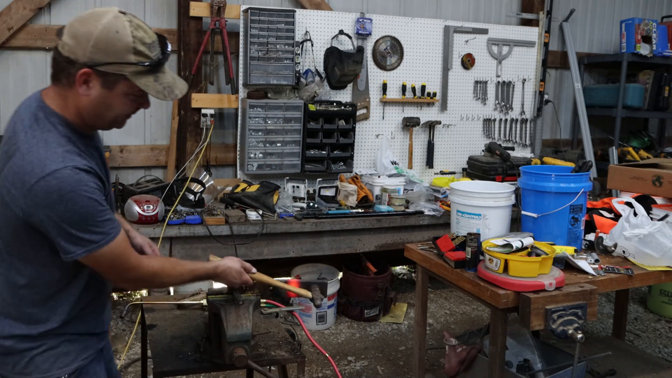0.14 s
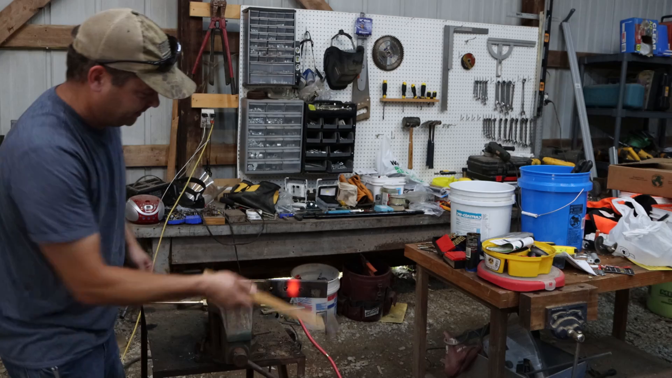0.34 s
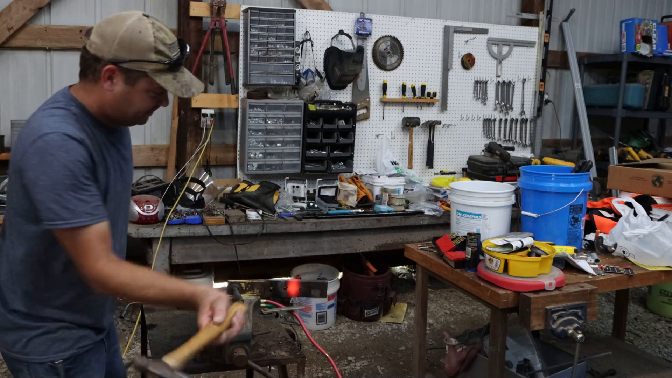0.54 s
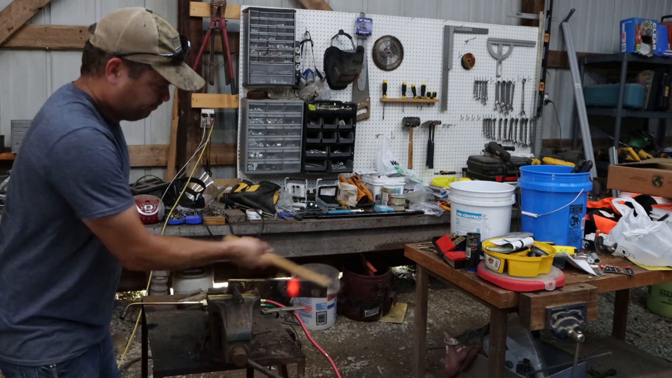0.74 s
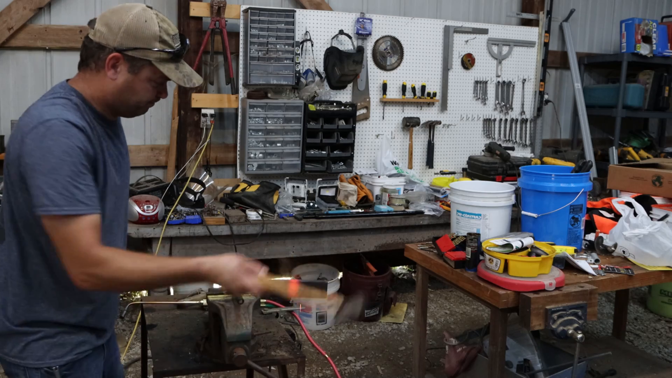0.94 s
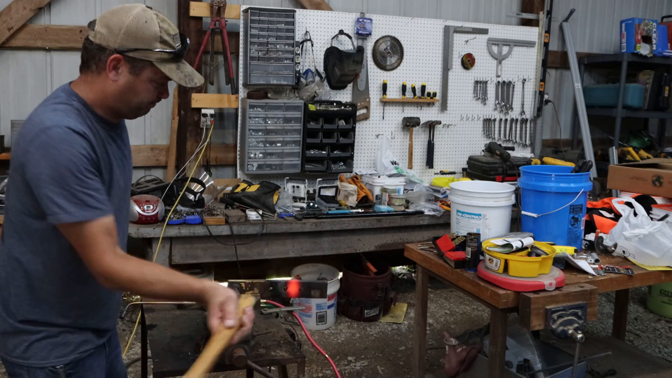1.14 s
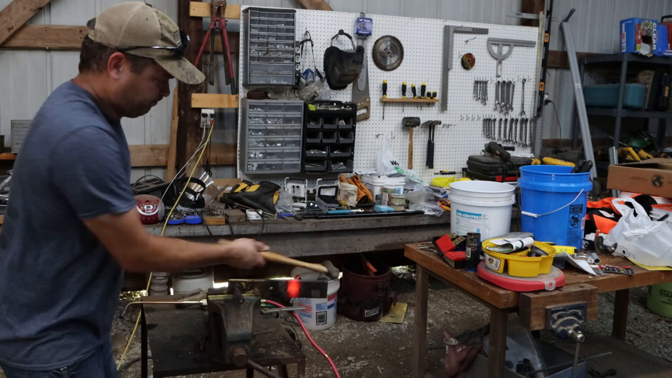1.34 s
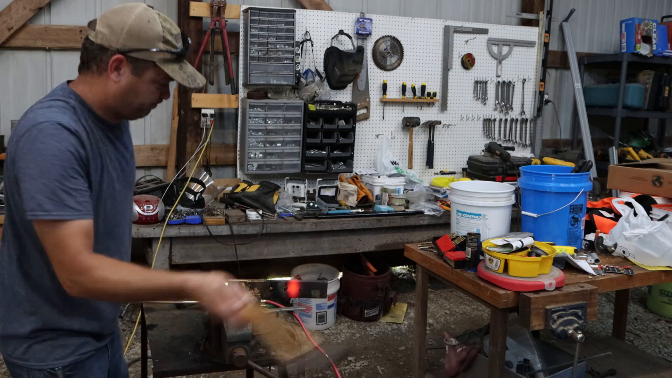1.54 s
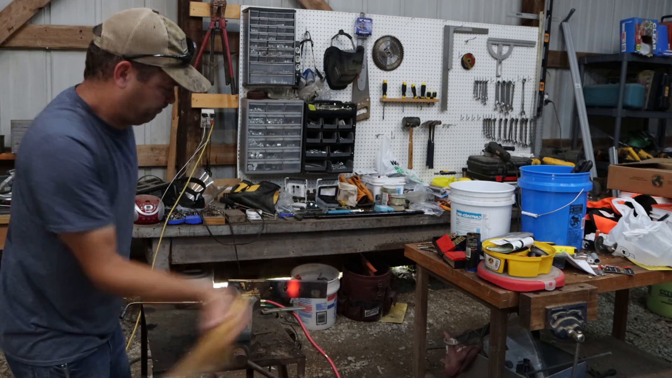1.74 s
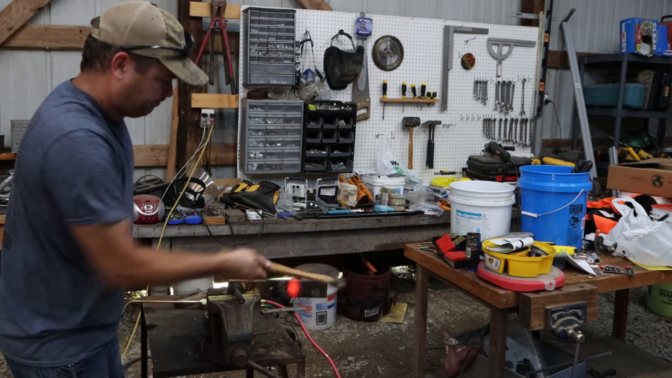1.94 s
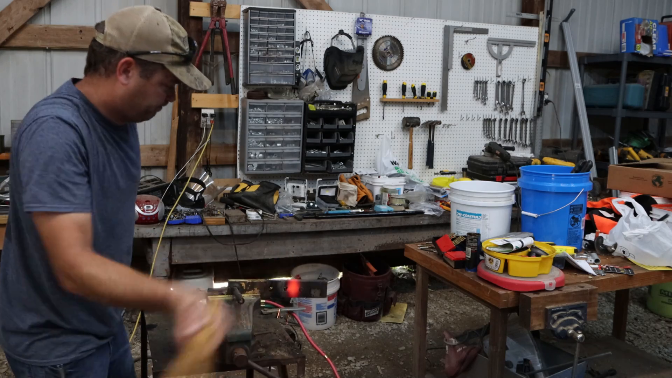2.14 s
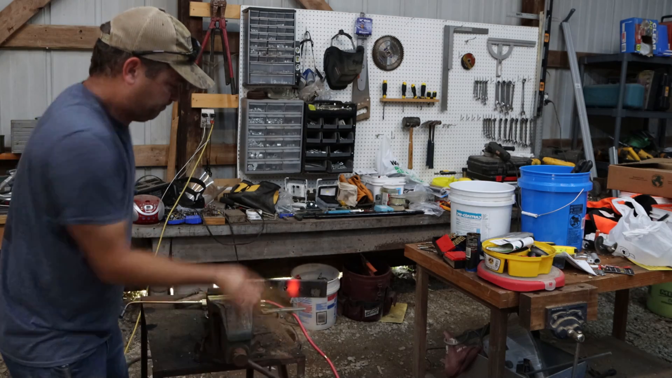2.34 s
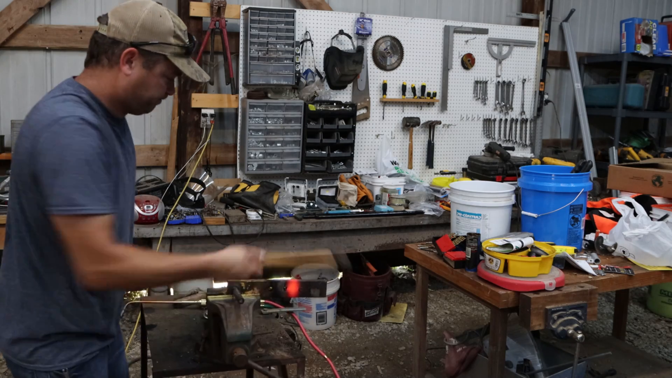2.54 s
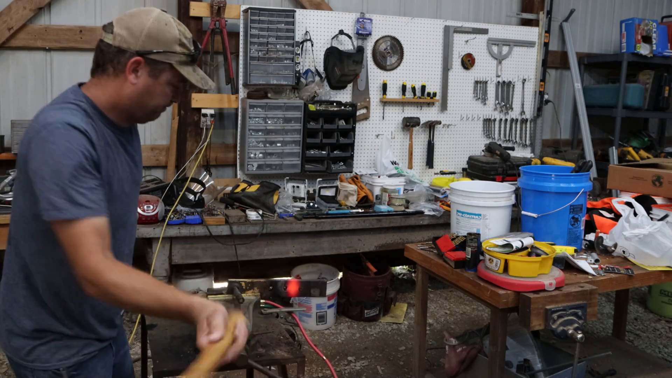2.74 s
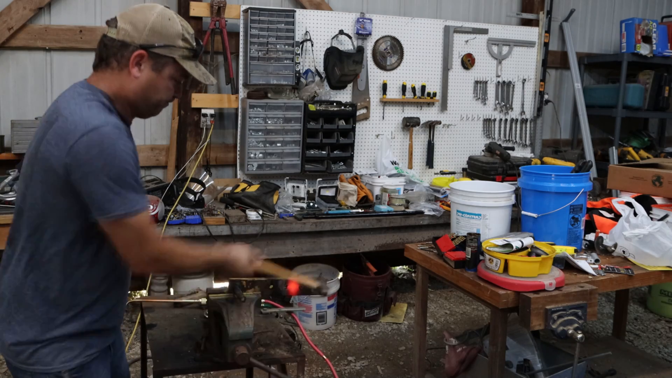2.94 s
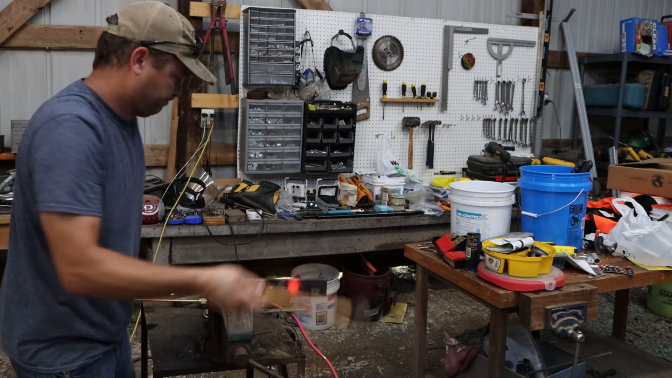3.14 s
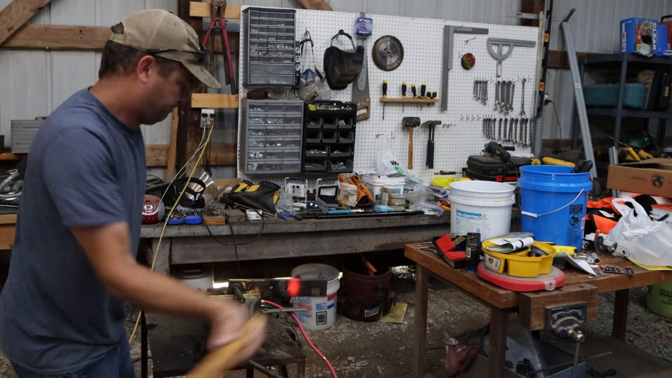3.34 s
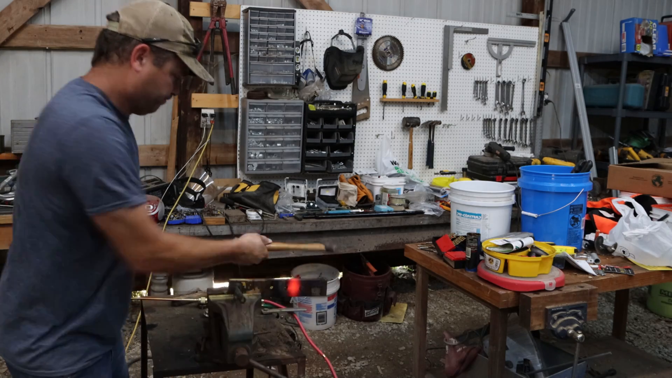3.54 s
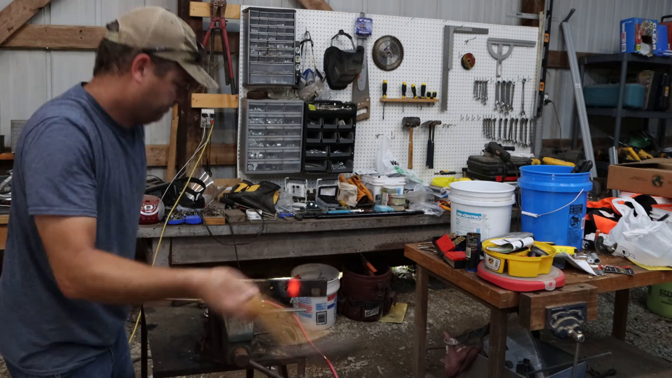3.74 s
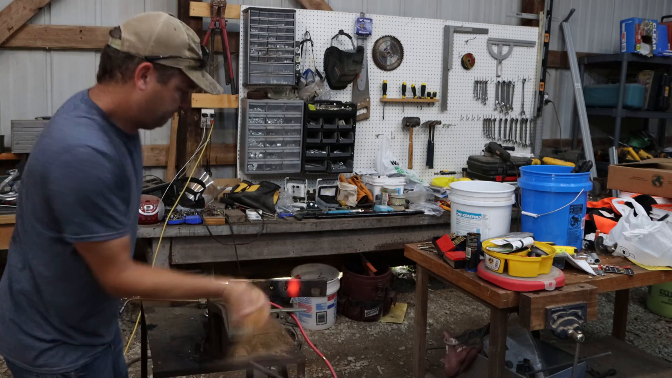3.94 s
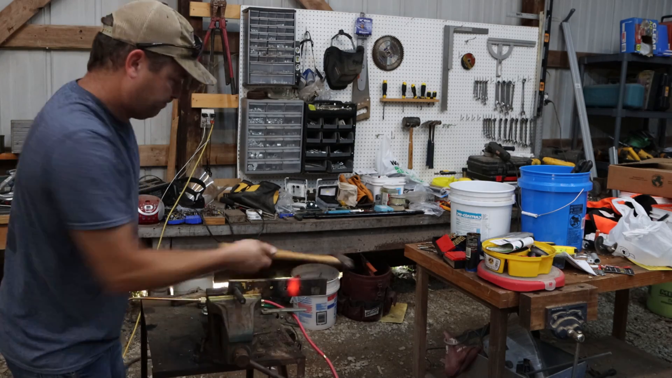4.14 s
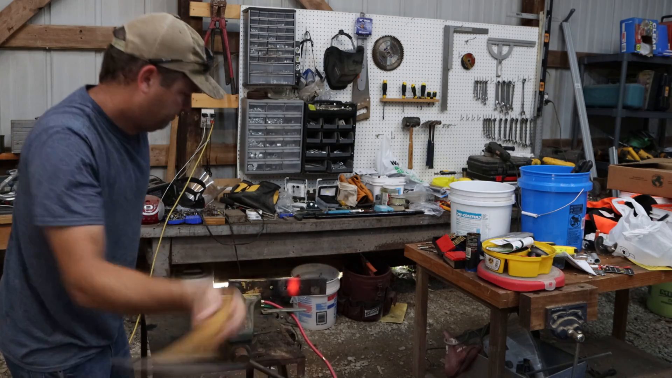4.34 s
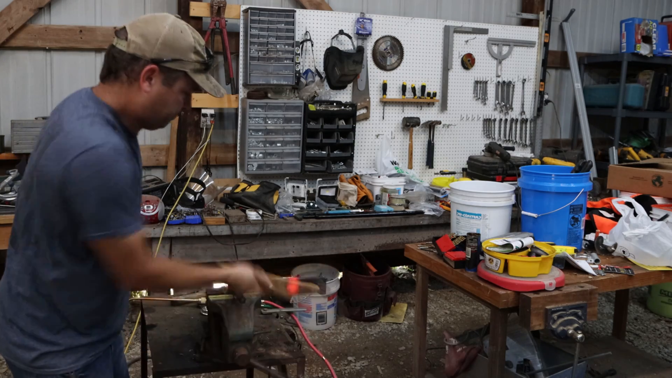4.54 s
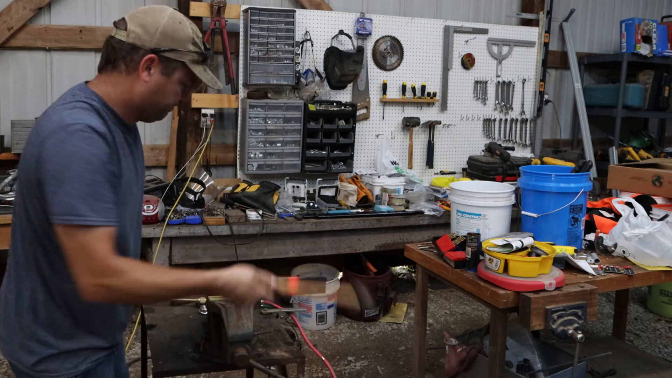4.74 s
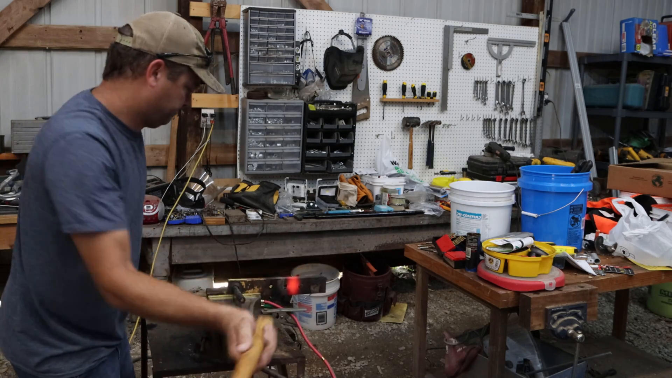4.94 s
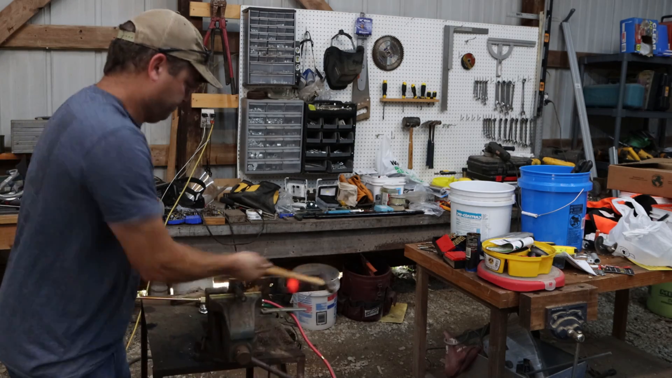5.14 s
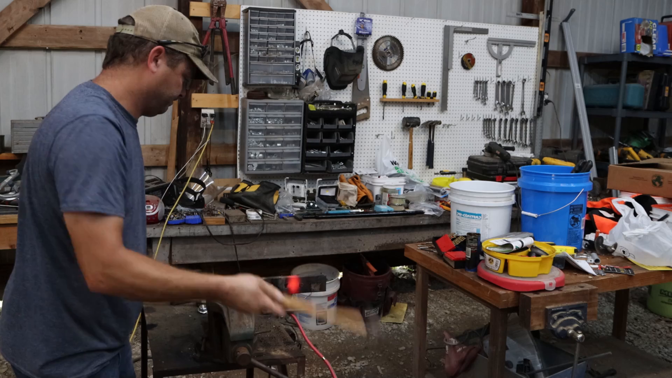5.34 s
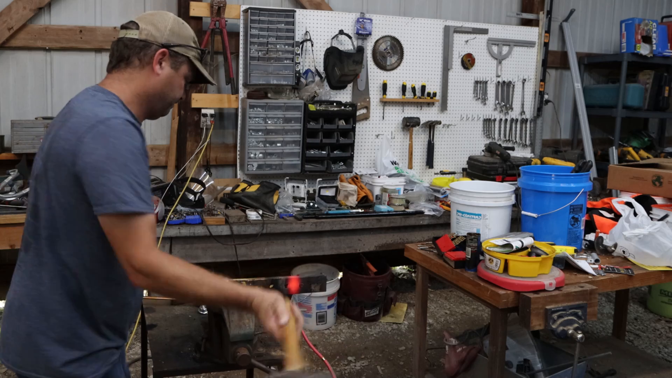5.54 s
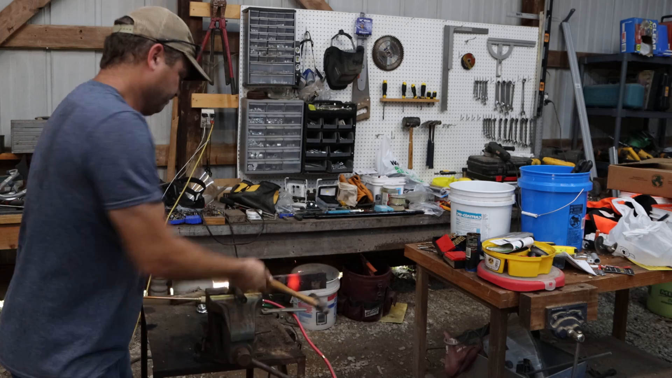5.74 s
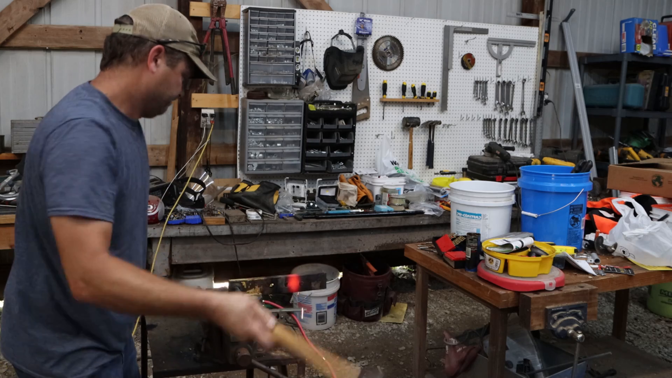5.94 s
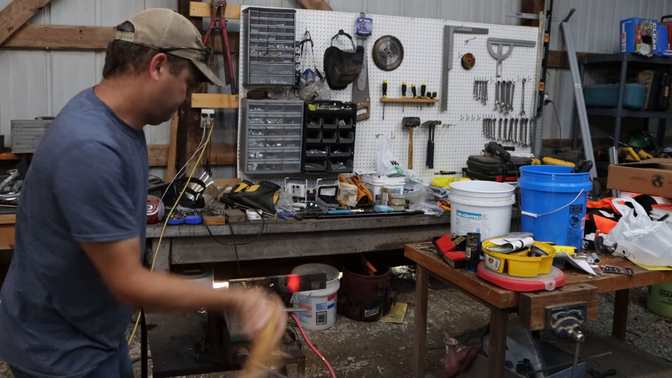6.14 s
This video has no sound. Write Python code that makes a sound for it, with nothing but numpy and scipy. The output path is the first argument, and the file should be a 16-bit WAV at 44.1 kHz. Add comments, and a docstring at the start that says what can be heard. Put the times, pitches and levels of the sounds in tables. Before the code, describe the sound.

A low, quiet, steady rush fills a metal-walled workshop. At 0.2 s a faint dull tick leads straight into a light aiming clank at 0.25 s, with a short ring of the steel bar alone; another faint tick follows at 0.7. Ten hard hammer blows then land at about 0.85, 1.4, 2.0, 2.5, 3.05, 3.6, 4.15, 4.7, 5.25 and 5.8 s. Each is a dense steel crack with a bright snap, a brief clangy ring of bar and heavy vise, a slight low bench jolt and a diffuse echo lasting under a second. Later blows are generally a little harder and brighter. Tiny steel bits ping high at 1.7 and 4.05 s; a hollow object thuds at 1.8. Soft handling ticks near 4.65 and 5.2 almost merge with the blows. The close mono camera microphone limits the hits, flattening their peaks and ducking the tails.

```python
"""A hammer bends a red-hot steel bar clamped in a vise, over the low steady rush (filtered noise) of a workshop.
After a faint tick comes one aiming tap, a clank that rings only the bar; three more ticks are spread over the scene.
Then ten hard swings crack (noise bursts), ring bar and vise (fading sines) and jolt the bench; the metal walls answer.
Between blows small steel bits tinkle twice (high fading sines) and something hollow thuds once (sines and a knock).
A mono camera microphone close by squashes the blows with its limiter."""
import sys
import numpy as np
from scipy import signal
from scipy.fft import rfft, irfft, next_fast_len
from scipy.io import wavfile

SR = 44100
rng = np.random.default_rng(int(sys.argv[2]) if len(sys.argv) > 2 else 0)


def pcm_store(signal):
    """Save signal as 16-bit PCM."""
    levels = np.round(np.clip(np.atleast_2d(signal), -1, 1) * 32767)
    wavfile.write(sys.argv[1], SR, levels.astype(np.int16).T)


N = 277830  # length in samples: 6.3 s


def amp(db):
    """Turn decibels into a gain: +20 dB is ten times the amplitude."""
    return 10 ** (np.asarray(db) / 20)


def norm(x):
    """Scale a sound so that its squared samples add up to 1."""
    return x / np.sqrt(np.sum(x ** 2) + 1e-20)


def along(points, hz):
    """Read a curve of (pitch_hz, value) points at any pitch, on a logarithmic pitch axis."""
    point_hz, value = np.transpose(points)
    return np.interp(np.log(hz + 1), np.log(point_hz + 1), value)


def clock():
    """The time of every sample in a one-second sound, in seconds."""
    return np.arange(SR) / SR


def decay(t, t60):
    """A fade that falls by 60 dB in t60 seconds, as vibration loses energy."""
    return np.exp(-np.log(1000) * t / t60)


def add(track, start_s, x):
    """Mix a sound into the track from start_s on, cut off where the track ends."""
    start = max(round(start_s * SR), 0)
    part = track[start:][:len(x)]
    part += x[:len(part)]


def coloured(x, points):
    """Filter by (pitch_hz, level_db) points; minimum phase, so nothing sounds before its cause."""
    size = 2 * next_fast_len(len(x))
    gain = amp(along(points, np.fft.rfftfreq(size, 1 / SR)))
    # Folding the cepstrum (the spectrum of the log gain) forward in time gives minimum phase.
    cepstrum = irfft(np.log(gain))
    cepstrum[1:size // 2] *= 2
    cepstrum[size // 2 + 1:] = 0
    response = np.exp(rfft(cepstrum))
    return irfft(rfft(x, size) * response)[:len(x)]


# How long the shed's echo takes to fade by 60 dB: pitch_hz, t60_s
SHED_FADE_TIMES = [(100, 0.54), (260, 1.0), (700, 0.96), (1840, 0.8365), (4850, 0.7046), (9000, 0.61),
                   (14000, 0.39)]
# The colour the walls give to their echo: pitch_hz, level_db
WALL_COLOUR = [(100, 1.5), (1000, -4), (5000, 0.5), (7000, 0.5), (11000, 1), (12500, 4.5), (16000, 3)]


def shed(x):
    """The walls' diffuse answer to x: a noise tail whose upper treble dies sooner than its middle."""
    hz, t, bands = signal.stft(rng.standard_normal(SR), SR, nperseg=256)
    fade = decay(t, along(SHED_FADE_TIMES, hz)[:, None])
    tail = signal.istft(bands * fade, SR, nperseg=256)[1][:SR]
    tail = tail * (1 - np.exp(-clock() / 0.0041))  # the echo builds up over a few milliseconds
    echo = coloured(norm(tail), WALL_COLOUR)
    return signal.fftconvolve(x, echo)[:SR]


def ring(modes, wet_db):
    """Struck metal or a hollow body: fading sines at slightly new strengths each time, with echo."""
    hz, level_db, t60 = np.transpose(modes)[:, :, None]
    varied_db = level_db + 1.5 * rng.standard_normal(hz.shape)
    gain = amp(varied_db) * rng.choice([-1, 1], hz.shape)
    sines = np.sin(2 * np.pi * hz * clock())
    near = norm(np.sum(gain * sines * decay(clock(), t60), 0))
    return near + amp(wet_db) * shed(near)


def impact(points, t60, rise, wet_db):
    """A sharp contact: dense vibration spreads over rise seconds and dies; walls answer in its colour."""
    envelope = (1 - np.exp(-clock() / rise)) * decay(clock(), t60)
    near = norm(coloured(rng.standard_normal(SR) * envelope, points))
    click = norm(coloured(signal.unit_impulse(SR), points))
    return near + amp(wet_db) * shed(click)


def contact(x, body_db, bright_db):
    """The colour of one contact: a hard one is shorter and so brighter."""
    return coloured(x, [(350, body_db), (900, 0), (2500, 0), (8000, bright_db)])


# Colour of the still workshop: pitch_hz, level_db (per Hz)
WORKSHOP_COLOUR = [(15, -53), (25, -23), (43, -29), (60, -8), (125, -2), (146, -3), (811, -8),
                   (4380, -28.5), (7680, -25.5), (15000, -44)]


def air():
    """The low steady rush of the workshop: noise spread over many pitches."""
    rush = norm(coloured(rng.standard_normal(N), WORKSHOP_COLOUR))
    return amp(-54) * np.sqrt(N) * rush  # average level -54 dB


# Faint handling ticks and shuffles: start_s, level_db, brightness_db
HANDLING = [(.209, -21, -14), (.678, -18.5, -16), (4.665, -7, -14), (5.214, -12, -12)]
# Colour of a steel-on-steel crack, also used by the hard swings: pitch_hz, level_db (per Hz)
CRACK_COLOUR = [(40, -46), (90, -30.5), (140, -12.5), (230, -13), (350, -6.5), (450, -8), (700, -4.5),
                (950, 1.5), (1400, -1), (2400, -0.5), (3500, -7.5), (7500, -12), (11000, -20), (16000, -36)]


def ticks():
    """Tools and feet tick and shuffle: short steel contacts with dulled treble."""
    out = np.zeros(N)
    for start_s, level_db, bright_db in HANDLING:
        tick = impact(CRACK_COLOUR, t60=0.06, rise=0.001, wet_db=-9)
        add(out, start_s, amp(level_db) * contact(tick, 0, bright_db))
    return out


# Colour of the light tap's contact: pitch_hz, level_db (per Hz)
TAP_COLOUR = [(150, -30), (450, -17.5), (750, 2), (2000, -3), (5000, -8.5), (6000, -16), (9000, -25.5),
              (15000, -47)]
# Ringing of the clamped bar, under the tap and every swing: pitch_hz, level_db, t60_s
BAR_MODES = [(690, -10, .1), (790, -7, .1), (894, -11, .42), (1125, -5, .14), (1233, 1, .11),
             (1572, -15, .25), (1915, -9, .28), (1950, -9, .25), (2283, -14, .4), (2363, -14, .35),
             (3138, -18, .3), (3440, -11, .27), (3870, -13, .15), (4240, -11, .15), (4662, -17, .2),
             (5060, -18, .25), (5125, -18, .35), (5790, -24, .45), (7316, -25, .35), (8270, -28, .45)]


def tap():
    """The light aiming tap is a short clank that rings only the bar."""
    out = np.zeros(N)
    edge = amp(11) * impact(TAP_COLOUR, t60=0.085, rise=0.0001, wet_db=-9)
    bar = amp(5.5) * ring(BAR_MODES, wet_db=-3)
    add(out, 0.2515, edge + contact(bar, body_db=2, bright_db=-6))
    return out


def spot(x, ripple_db, count):
    """Each swing lands on a different spot, which favours some of the steel's many high resonances."""
    hz = np.geomspace(700, 14000, count)
    level_db = ripple_db * rng.standard_normal(count)
    return coloured(x, np.column_stack([hz, level_db]))


# Hard swings: start_s, force_db (relative), brightness_db, jolt_db (bench, relative to the force)
SWINGS = [(.8370, -3, -3, -31), (1.4163, 0, -6, -37), (1.9773, 0.5, 0, -24), (2.5208, 0, -2.5, -32),
          (3.0671, 1.5, 1, -18), (3.6001, 1, -3.5, -37), (4.1555, 2, 2, -34), (4.7006, 2, 1.5, -24),
          (5.2525, .5, 4, -36), (5.8018, 1.5, 1, -28)]
# Ringing of the heavy vise and its stand, only under full swings: pitch_hz, level_db, t60_s
VISE_MODES = [(222, -13, .2), (280, -12, .2), (366, -13, .5), (466, -13, .2), (850, -3, .18), (905, -3, .3),
              (992, 1, .38), (1050, -2, .22), (1153, -1, .25), (1266, 0, .28), (1392, -7, .2),
              (1538, -9, .45), (1626, -3, .22), (1761, -6, .25), (1890, -5, .25), (1992, -5, .2),
              (2143, -5, .25), (2266, -4, .3), (2510, -5, .2), (2719, -4, .22), (3088, -10, .25),
              (3168, -10, .25), (4440, -9, .12), (8420, -7, .06)]
# Colour of a blow's first bright snap: pitch_hz, level_db (per Hz)
SNAP_COLOUR = [(500, -11), (2500, 0.5), (8500, -1), (14000, -13), (16000, 0)]
# Colour of the bench's jolt: pitch_hz, level_db (per Hz)
JOLT_COLOUR = [(15, -14), (35, -18), (70, -4), (150, -1), (400, -23)]


def hammer():
    """Full swings crack, ring bar and vise and jolt the bench."""
    out = np.zeros(N)
    for start_s, force_db, bright_db, jolt_db in SWINGS:
        crack = impact(CRACK_COLOUR, t60=0.11, rise=0.0019, wet_db=1.5)
        crack = spot(crack, ripple_db=1.5, count=120)
        vise = amp(-5.5) * ring(VISE_MODES, wet_db=-5.5)
        bar = amp(-14.5) * ring(BAR_MODES, wet_db=-15.5)
        snap = amp(-8.5) * impact(SNAP_COLOUR, t60=0.012, rise=0.00066, wet_db=-37)
        jolt = amp(jolt_db) * impact(JOLT_COLOUR, t60=0.1, rise=0.0031, wet_db=-27)
        # Every full swing has the same weight in the low middle.
        steel = contact(crack + vise + bar, body_db=1, bright_db=bright_db)
        add(out, start_s, amp(force_db + 23.5) * (steel + snap + jolt))
    return out


# When the loose steel bits tinkle: start_s, level_db
BIT_TINKLES = [(1.709, -22), (4.04, -16.5)]
# Ringing of a small steel bit: pitch_hz, level_db, t60_s
BIT_MODES = [(5303, -14, .3), (6620, -8, .3), (8247, 0, .25), (12150, -19, .12)]


def tinkles():
    """Loose steel bits ping: small pieces ring at high pitches."""
    out = np.zeros(N)
    for start_s, level_db in BIT_TINKLES:
        add(out, start_s, amp(level_db) * ring(BIT_MODES, wet_db=-4))
    return out


# Ringing of the hollow thing: pitch_hz, level_db, t60_s
HOLLOW_MODES = [(213, -10, 0.068), (250, 3.5, 0.097), (346, 1.5, 0.2), (374, 1.5, 0.28), (487, -6, 0.088),
                (577, -5, 0.18), (930, -12, 0.52), (1230, 9, 0.036), (1710, -7, 0.12)]
# Colour of the knock against it: pitch_hz, level_db (per Hz)
KNOCK_COLOUR = [(90, -34), (200, 3), (500, -1.5), (1300, -6), (2500, -12), (5000, -16.5), (9000, -28),
                (15000, -40)]


def thud():
    """Something hollow is knocked once between two blows; it is too small to radiate deep bass."""
    out = np.zeros(N)
    body = amp(17) * ring(HOLLOW_MODES, wet_db=-8)
    knock = amp(17) * impact(KNOCK_COLOUR, t60=0.11, rise=0.00019, wet_db=-6.5)
    add(out, 1.8110, coloured(body + knock, [(50, -31), (180, 0)]))
    return out


def scene():
    """All sounds reach one microphone, which feeds both channels."""
    mono = air() + ticks() + tap() + hammer() + tinkles() + thud()
    return np.tile(mono, (2, 1))


def limiter(x, threshold_db, attack, release_db):
    """Short-term level over the threshold pulls the gain down; it recovers at release_db a second."""
    pole = np.exp(-1 / (attack * SR))  # attack: averaging time in seconds
    power = signal.lfilter([1 - pole], [1, -pole], np.mean(x ** 2, 0))
    over_db = np.maximum(10 * np.log10(power + 1e-12) - threshold_db, 0)
    recovery_db = release_db * np.arange(N) / SR
    # The running maximum holds each cut, less what has recovered since.
    cut_db = np.maximum.accumulate(over_db + recovery_db) - recovery_db
    return x * amp(-cut_db)


def record(dry):
    """The camera limits, rounds off the peaks that slip through and keeps nothing above its band limit."""
    limited = limiter(dry, threshold_db=-5.5, attack=0.00061, release_db=103)
    rounded = limited / (1 + np.abs(limited / 0.7) ** 4) ** (1 / 4)  # peaks stay below 0.7
    size = next_fast_len(N + SR)
    hz = np.fft.rfftfreq(size, 1 / SR)
    passband = np.clip((15900 - hz) / 500 + 0.5, 0, 1)  # a 500 Hz wide slope centred on 15900 Hz
    return irfft(rfft(rounded, size) * passband, size)[:, :N]


dry = scene()
out = record(dry)
pcm_store(out)
```